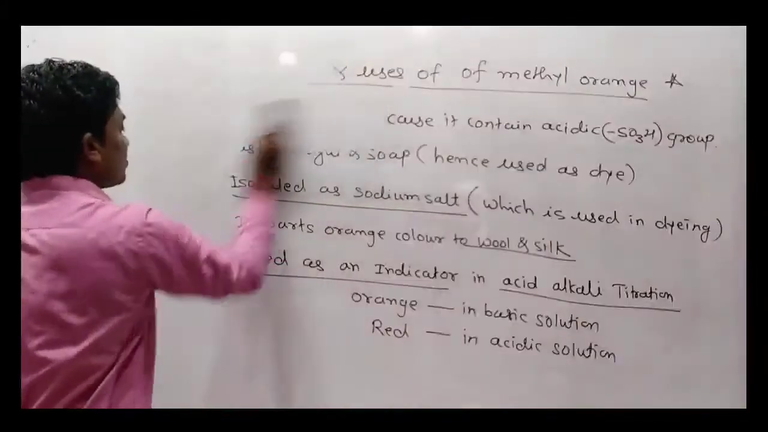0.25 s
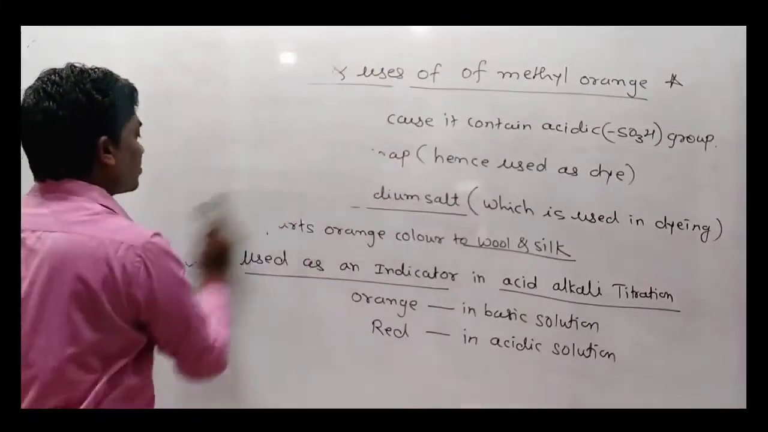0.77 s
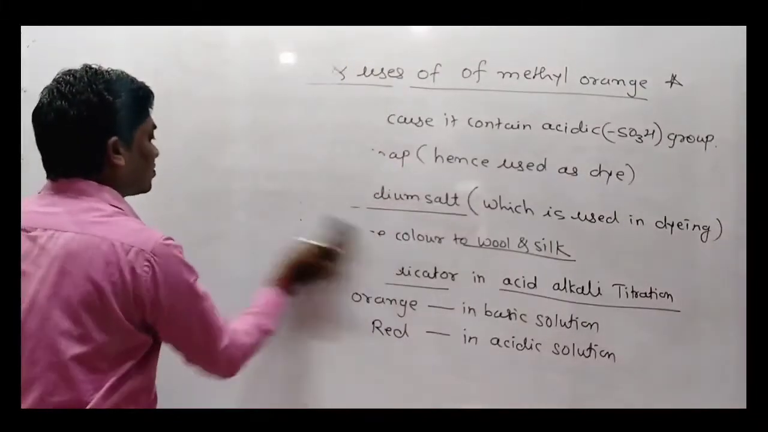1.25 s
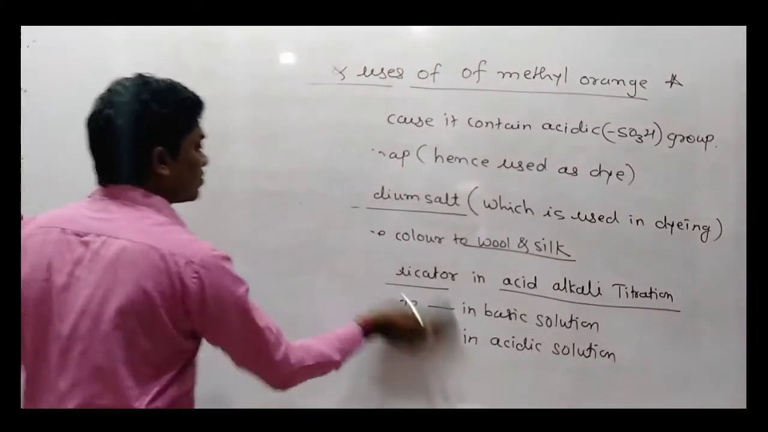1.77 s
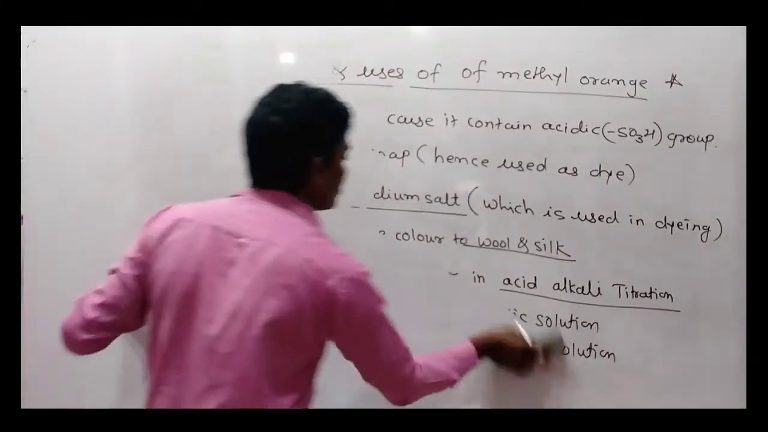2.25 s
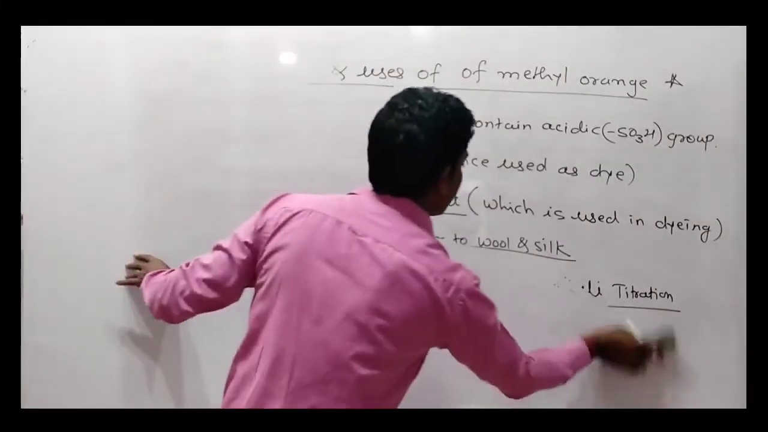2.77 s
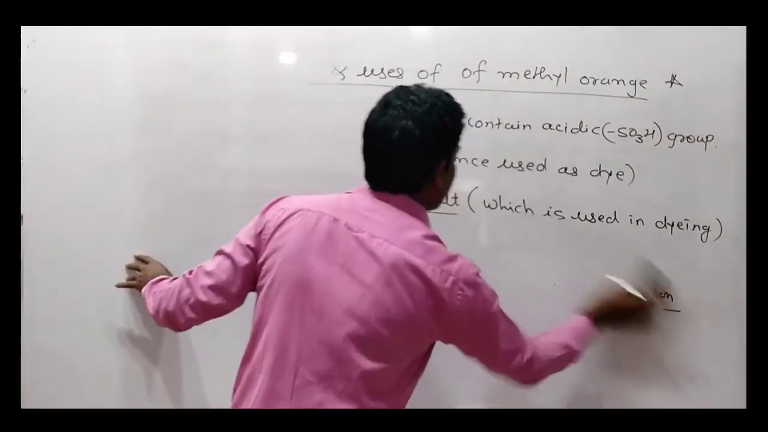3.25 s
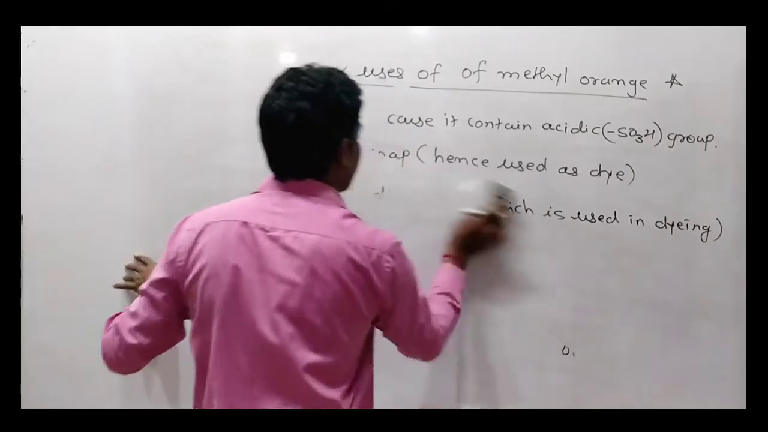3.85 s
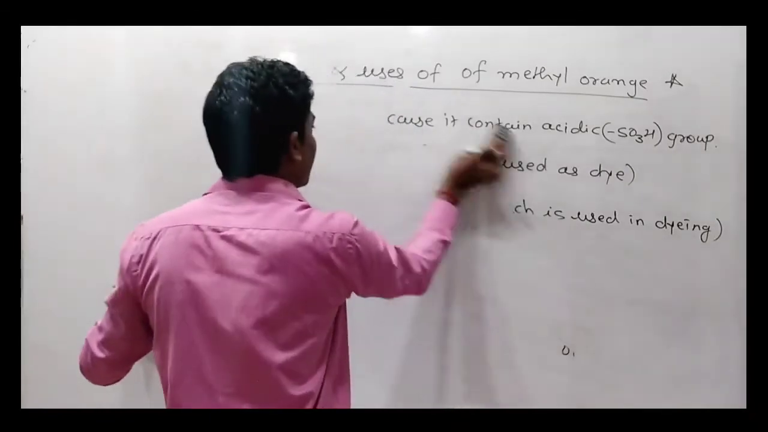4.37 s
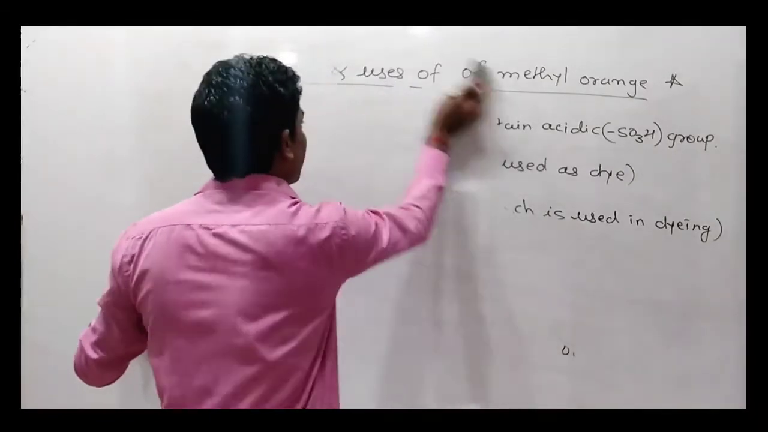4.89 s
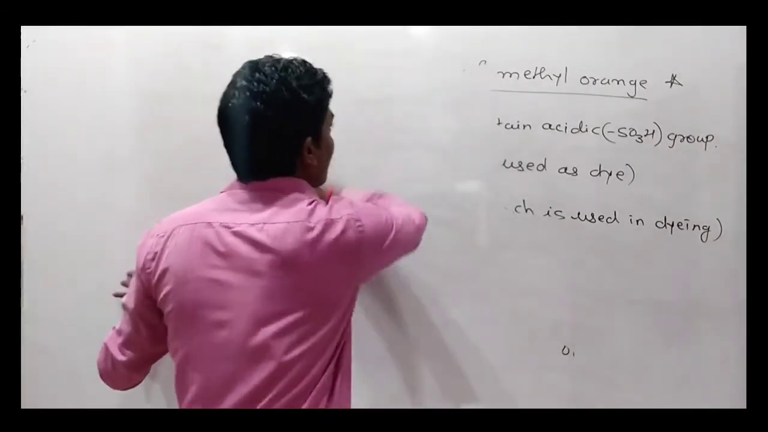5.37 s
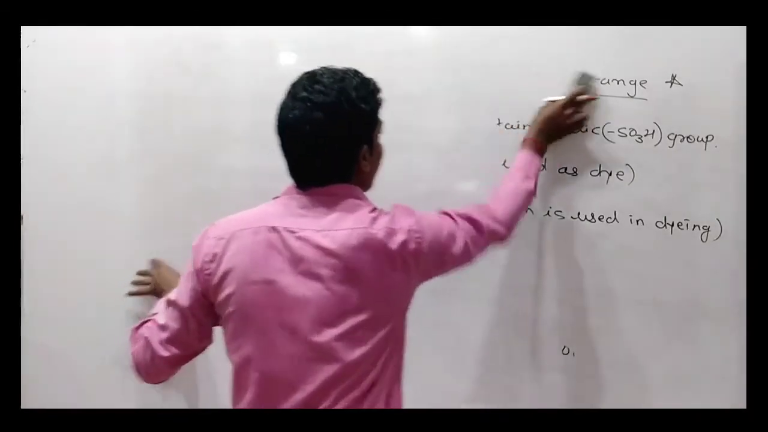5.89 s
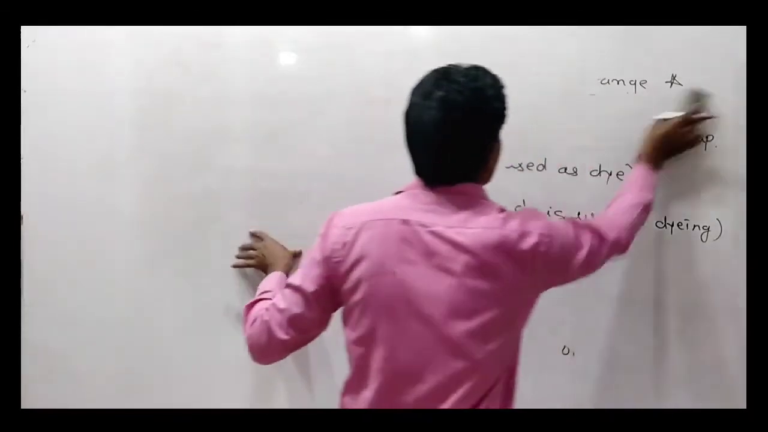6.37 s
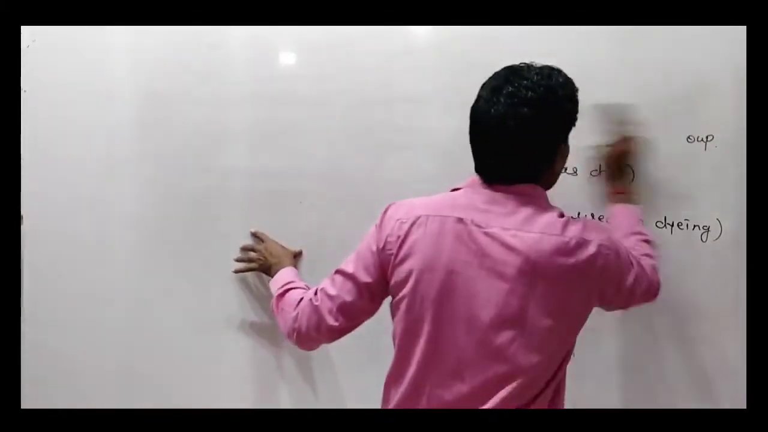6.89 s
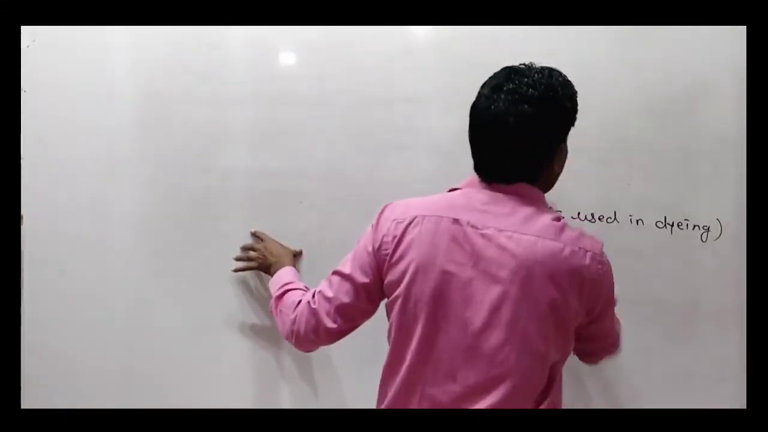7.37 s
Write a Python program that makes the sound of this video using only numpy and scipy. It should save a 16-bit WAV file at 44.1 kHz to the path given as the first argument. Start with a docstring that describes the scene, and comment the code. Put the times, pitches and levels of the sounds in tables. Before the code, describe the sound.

A felt duster wipes a loose whiteboard in quick hissing strokes, with scattered knocks, deep board wobble, brief rough squeals and low room rumble.

```python
"""From the outset a felt duster wipes a whiteboard in quick strokes, three to four a second: fibres slip
and hiss, fuller in places, while the loose board sways, drums and knocks over a low hum and room rumble.
Dull noise tails die away, mostly following knocks; three low thumps sound. Near 2.7 s and 7.1 s come
rasps, a rough rising squeal in scraping noise. A dull swell rises at 4.7 s, and near 5.4 s and 6.9 s thin
pairs of partials squeak and fall; rasps and squeaks ring on in a classroom of decaying noise."""
import sys
import numpy as np
from scipy import signal
from scipy.fft import rfft, irfft
from scipy.io import wavfile
from scipy.ndimage import uniform_filter1d

SR = 44100
rng = np.random.default_rng(int(sys.argv[2]) if len(sys.argv) > 2 else 0)


def digitize_waveform(pressure):
    """Quantize a signal to 16-bit integers and store it at the path in sys.argv[1].

    Rows of a 2-D input are taken as channels; values are limited to [-1, 1].
    """
    field = np.atleast_2d(pressure).T
    bounded = np.clip(field, -1, 1)
    quanta = np.round(bounded * 32767).astype(np.int16)
    wavfile.write(sys.argv[1], SR, quanta)


N = 336483
TIME = np.arange(N) / SR
TOP_HZ = 15600

# Wiping strokes: (start [s], length [s], hiss at full speed before the wiping trim [dB],
# share of the stroke spent speeding up, rubbing pressure at full speed before the trim [dB])
STROKES = [(-.12, 0.32, -64.5, 0.24, -56.5), (0.17, 0.23, -64, 0.62, -57.5),
           (0.378, 0.23, -62.5, 0.54, -57), (0.65, 0.25, -63.5, 0.64, -58), (0.901, 0.23, -61.5, 0.52, -60),
           (1.198, 0.26, -65.5, 0.55, -58), (1.434, 0.26, -63.5, 0.51, -60),
           (1.766, 0.18, -66, 0.79, -58.5), (1.956, 0.28, -63, 0.38, -59), (2.259, 0.2, -64, 0.77, -58),
           (2.46, 0.28, -61.5, 0.43, -60.5), (2.794, 0.3, -62.5, 0.46, -56),
           (3.078, 0.28, -61.5, 0.12, -57.5), (3.386, 0.3, -64, 0.6, -55.5),
           (3.648, 0.24, -62.5, 0.58, -56.5), (3.904, 0.19, -65, 0.66, -59.5),
           (4.104, 0.26, -64, 0.42, -60), (4.388, 0.21, -65.5, 0.77, -57.5), (4.61, 0.27, -65, 0.4, -62.5),
           (4.896, 0.43, -64, 0.37, -59), (5.293, 0.64, -63.5, 0.23, -60),
           (5.888, 0.23, -65.5, 0.61, -59.5), (6.113, 0.36, -63.5, 0.35, -57.5),
           (6.465, 0.27, -63.5, 0.72, -57), (6.737, 0.32, -63, 0.35, -58.5), (7.045, 0.34, -63, 0.58, -59),
           (7.33, 0.35, -62, 0.41, -58)]
# Spectrum of the slipping felt: (frequency [Hz], relative density [dB])
FELT_SPECTRUM = [(1200, -20), (2800, 0), (4500, 2.5), (7000, 1.5), (10000, -0.5), (13000, -0.5),
                 (16000, -4)]
# Spectrum of the rubbing passed into the board: (frequency [Hz], relative density [dB])
RUB_SPECTRUM = [(150, 1), (300, 4.5), (480, -2.5), (700, 0.5), (1000, -4.5), (1500, -3), (2000, -5),
                (2800, -5.5), (4000, -12.5), (7000, -20.5), (12000, -34)]
# Shoves that set the loose board moving: (time [s], sway level [dB], drumming level [dB])
PUSHES = [(0.0, -49, -41), (.13, -33.5, -37), (.40, -32, -46), (.69, -31, -55), (.88, -40.5, -56),
          (1.15, -34.5, -40), (1.44, -30.5, -43.5), (1.70, -37.5, -46.5), (2.08, -23.5, -46),
          (2.28, -28.5, -51), (2.451, -27, -47), (2.64, -35, -67), (3.028, -25.5, -41), (3.24, -33, -45.5),
          (3.669, -31, -51), (3.89, -32, -46), (4.35, -29, -52), (4.6, -30, -60), (4.80, -39, -44),
          (5.25, -30, -68), (6.249, -33.5, -47), (7.30, -32.5, -49)]
# Spectrum of the slow sway of the panel: (frequency [Hz], relative density [dB])
SWAY_SPECTRUM = [(8, -11.5), (16, 6), (23, 5.5), (32, -21), (43, -10), (55, -28), (70, -47), (120, -53)]
# Spectrum of the drumming of the panel: (frequency [Hz], relative density [dB])
DRUM_SPECTRUM = [(32, -10), (43, 9.5), (55, -6), (68, -11), (80, -6.5), (105, -14), (150, -19), (200, -24),
                 (270, -31.5), (400, -33), (800, -72)]
# Wavering of the low hum: (time [s], level before the hum trim [dB])
HUM_LEVEL = [(0.0, -68), (.2, -64), (.62, -51), (1.15, -56), (1.85, -52.5), (2.3, -56.5), (2.68, -60.5),
             (3.5, -55.5), (4.0, -54.5), (4.44, -65.5), (4.9, -52), (5.4, -62), (6.2, -69), (6.55, -57),
             (7.0, -53), (7.2, -59.5), (7.63, -58.5)]
# Spectrum of the steady room rumble: (frequency [Hz], relative density [dB])
ROOM_RUMBLE_SPECTRUM = [(60, -4), (130, -0.5), (190, 1.5), (260, -8), (340, -18.5), (600, -23.5)]
# Knocks of duster and board: (time [s], peak of the ring [dB], centre of the sound [Hz],
# tick re the ring's peak [dB], ring of the struck spot [Hz], snap re the ring's peak [dB])
TAPS = [(0.0754, -48, 1930, -22, 2400, -10), (0.1345, -31.5, 1070, -13.5, 1690, -4),
        (0.1479, -39, 1150, -23, 1410, -8), (0.22, -42, 1020, -19, 1600, -10),
        (0.626, -54, 1300, -20, 1250, -12), (0.824, -28.5, 1210, -10, 2500, -10),
        (1.044, -44.5, 2300, 0.5, 3240, -20), (1.0662, -42.5, 1600, -18, 1400, -12),
        (1.12, -47.5, 1670, -2, 1710, -10), (1.153, -43, 1100, -20, 1080, -10),
        (1.1605, -34, 1330, -7, 1285, -2), (1.198, -38.5, 1390, -19, 1790, -7),
        (1.4203, -28, 890, -17.5, 1320, -8), (1.58, -35.5, 1770, -23, 1800, -3),
        (1.659, -44, 1490, -20, 1490, -1), (2.2534, -45.5, 1690, -12, 1750, -3),
        (2.3244, -41.5, 1550, -26, 1450, -10), (2.4537, -40.5, 770, -24, 695, -10),
        (2.7582, -42.5, 1550, -19, 1510, -14), (2.867, -36, 1270, -22, 1080, -5),
        (3.0539, -26, 800, -22, 580, -4.5), (3.134, -43, 1100, -20, 1400, -10),
        (3.3457, -46, 1500, -19, 1500, -12), (3.523, -39.5, 1730, -26, 1550, -4),
        (3.6138, -44, 1290, -11, 1220, -10), (3.6841, -26, 734, -23, 1064, -6.5),
        (3.9508, -41.5, 1480, -26, 1530, -19), (4.014, -45, 1404, -16, 1380, -8),
        (4.1938, -44, 810, -17, 845, -9), (4.346, -44, 1700, -18, 1810, -8),
        (4.6175, -33, 850, -17, 1250, -8), (4.995, -47, 1430, -11, 1800, -8),
        (5.258, -31.5, 850, -15, 1590, -5.5), (5.6891, -37.5, 1750, -22, 1960, -18),
        (5.8382, -37.5, 1310, -27, 1480, -4), (5.8496, -41, 1400, -24, 1500, -14),
        (5.879, -47, 850, -24, 810, -12), (5.976, -48, 990, -24, 1090, -12),
        (6.1982, -37, 1200, -26, 1470, -21), (6.5425, -47, 1600, -18, 1500, -10),
        (6.592, -44.5, 2190, -16, 2320, -10), (6.6473, -35.5, 1270, -3.5, 2080, -5),
        (7.2422, -33.5, 1080, -10, 1630, -9), (7.319, -32, 800, -11, 1520, 2),
        (7.615, -44, 2430, -6, 2330, -8)]
# Modes that every knock excites, before their random scatter:
# (frequency [Hz], level [dB], decay by 60 dB [s])
BOARD_MODES = [(310, 10, 0.01), (570, -1, 0.013), (670, 23, 0.0089), (1135, 11, 0.011), (1552, 7, 0.019),
               (2298, 10, 0.01), (2480, 6.5, 0.0077), (3200, 11, 0.0056)]
# Spectrum of the sharp tick of a knock: (frequency [Hz], relative density [dB])
TICK_SPECTRUM = [(500, -9), (3000, 4), (8000, 6), (12000, -1.5), (16000, -3)]
# Spectrum of the dry snap at the start of a knock: (frequency [Hz], relative level [dB])
SNAP_SPECTRUM = [(450, -7), (800, -1.5), (1400, -4), (2300, 2), (3000, 2.5), (3800, -11), (9000, -26)]
# Reverberation of the classroom: (frequency [Hz], decay by 60 dB [s])
ROOM_T60 = [(200, 1.1), (1000, 1.28), (3000, 1.68), (4600, 1.63), (6000, 1.29), (9000, 0.54), (15000, 0.27)]
# Dull noise tails, mostly following knocks: (start [s], level [dB], decay by 60 dB [s])
DULL_TAILS = [(0.143, -54.5, 1), (2.87, -51.5, 0.24), (3.056, -72, 0.98), (3.689, -54, 0.52),
              (6.648, -63, 0.49)]
# Spectrum of a dull tail: (frequency [Hz], relative density [dB])
DULL_TAIL_SPECTRUM = [(330, -5), (480, 1.5), (680, -3), (1100, -10), (2000, -22), (4000, -23)]
# Stretches where the wiping sounds fuller:
# (middle [s], length [s], level before the fade [dB], resonance at 0.8 of full speed [Hz])
FULLER_STRETCHES = [(0.31, 0.17, -70, 3000), (0.27, 0.22, -66, 1200), (0.849, 0.41, -65, 2500),
                    (1.048, 0.21, -63, 3080), (1.19, 0.16, -68, 2500), (1.613, 0.16, -62.5, 2860),
                    (2.093, 0.26, -62.5, 2550), (2.376, 0.16, -63.5, 2120), (2.594, 0.19, -61, 2680),
                    (5.063, 0.25, -74, 2600), (5.721, 0.47, -66.5, 4400), (6.25, 0.33, -71, 4600),
                    (6.328, 0.46, -64, 1400), (6.555, 0.17, -61.5, 1660)]
# Landings of the duster's heel: (time [s], level [dB], panel mode [Hz], decay by 60 dB [s])
THUMPS = [(1.149, -45, 91.5, .3), (2.082, -32, 76.5, .22), (3.049, -34, 59.4, 0.56)]
# Bursts of the rasps: (start [s], length [s], level before the fade and room mix [dB], start pitch [Hz],
# end pitch [Hz], squeal re the level [dB], upper edge of the scrape [Hz], its lifted band [Hz])
RASPS = [(2.707, 0.044, -57, 2046, 2194, -2, 4800, 4270), (2.761, 0.057, -46, 2750, 3410, -7, 7000, 5640),
         (2.802, 0.063, -44, 2550, 2930, -8, 6600, 6400),
         (2.862, 0.0426, -44.5, 2740, 3110, -4.5, 6360, 4600),
         (2.907, 0.042, -43, 2856, 3480, -5.5, 6150, 3650),
         (2.966, 0.063, -43.5, 3106, 3390, -7, 6140, 6050), (7.083, 0.03, -54, 1870, 2480, -4, 8100, 7400),
         (7.153, 0.036, -46.5, 2536, 2897, -8, 6400, 5500),
         (7.19, 0.041, -44.5, 2002, 2610, -3.5, 5350, 4200), (7.23, 0.026, -58, 2600, 2800, -5, 6300, 4300),
         (7.267, 0.043, -40.5, 3210, 3520, -11, 6900, 6270)]
# Spectrum of the scrape in a rasp: (frequency [Hz], relative density [dB])
RASP_SPECTRUM = [(1000, -23), (1900, -12), (2500, 3.5), (3100, -4), (3800, 0.5), (4700, 0.5), (5500, 1.5),
                 (6400, -4.5), (7200, -4), (10000, 0.5), (15000, -15)]
# Narrow bands lifted or cut in every rasp: (frequency [Hz], width [Hz], lift [dB])
RASP_RINGS = [(2870, 120, 5.5), (3175, 110, 5), (3450, 81, 6), (4130, 60, -3), (4760, 25, 6), (5100, 40, 3),
              (6260, 60, 0)]
# Spectrum of the dull swell: (frequency [Hz], relative density [dB])
SWELL_SPECTRUM = [(50, -13), (90, 8), (140, -2), (210, -0.5), (300, -5), (420, -16), (700, -14),
                  (1500, -63)]
# Falling squeaks: (start [s], length [s], start pitch [Hz], end pitch [Hz],
# direct level [dB], upper partial re the lower one [dB])
SQUEAKS = [(5.35, 0.12, 3105, 2646, -58.5, -10), (6.848, 0.074, 3170, 2970, -59, -8),
           (6.906, 0.063, 2774, 2506, -59, -19)]


def undb(db):
    """Decibel law: level to amplitude ratio."""
    return 10 ** (np.asarray(db) / 20)


def unit(x):
    """Normalisation to an rms of 1."""
    return x / np.sqrt(np.mean(x ** 2))


def decay(age, t60):
    """Exponential damping: a fall of 60 dB in t60 seconds."""
    return np.exp(-np.log(1000) * age / t60)


def lookup(hz, points):
    """Interpolation of (frequency, value) points on a logarithmic frequency axis."""
    f, value = np.transpose(points)
    return np.interp(np.log(hz + 1), np.log(f), value)


def bins(n):
    """Frequencies of the Fourier components of n samples."""
    return np.arange(n // 2 + 1) * SR / n


def colour(x, points):
    """Spectral shaping: the given curve, rolled off steeply beyond its end points, at rms 1."""
    hz = bins(len(x))
    ends = np.minimum(hz / points[0][0], 1) ** 2 / np.maximum(hz / points[-1][0], 1) ** 2
    return unit(irfft(rfft(x) * undb(lookup(hz, points)) * ends, len(x)))


def resonate(x, rings):
    """Resonance in parallel: narrow bands are lifted or cut beside the direct sound."""
    hz = bins(len(x))
    gain = 1 + sum((undb(db) - 1) / (1 + 2j * (hz - f) / width) for f, width, db in rings)
    return irfft(rfft(x) * gain, len(x))


def sweep(x, hz, width_hz):
    """Heterodyne resonance: shift the moving centre to zero, low-pass, and shift back; rms 1."""
    turn = np.exp(2j * np.pi * np.cumsum(hz) / SR)
    pole = np.exp(-np.pi * width_hz / SR)
    lowpassed = signal.lfilter([1], np.poly([pole, pole]), x / turn)
    return unit(np.real(turn * lowpassed))


def walk(rate):
    """Smoothed random steps: a wander of rms 1, with `rate` steps a second."""
    k = int(SR / rate)
    steps = np.repeat(rng.standard_normal(N // k + 1), k)
    return unit(uniform_filter1d(steps, k))[:N]


def add(out, start, sound):
    """Superposition: mix a sound in at a time in seconds."""
    i = max(int(start * SR), 0)
    out[i:i + len(sound)] += sound[:N - i]


def catches(per_s, spread_db):
    """Impulsive noise, as from slipping fibres: random clicks of unequal size; rms 1."""
    size = undb(spread_db * np.minimum(rng.exponential(size=N), 5))
    return unit((rng.random(N) < per_s / SR) * size * rng.standard_normal(N))


def stroke_speed(start, length, rise):
    """Reciprocating motion: speed climbs from one turn to 1 and falls to 0 at the next."""
    peak = start + length * np.clip(rise, .1, .9)
    turn = np.interp(TIME, [start, peak, start + length], [0, 1, 0])
    return np.sin(np.pi / 2 * turn)


def wiping(hiss_db=2, rub_db=-0.5, grain_db=-1.0, scratch_db=-12.0, flutter_db=1.69,
           shell_db=-9, shell_hz=1350, shell_width_hz=550,
           shell_rise_octaves=0.32, shell_drift_octaves=0.23):
    """Sliding friction: slips crowd with speed, pressure drives the board, the shell's resonance climbs."""
    turn_hiss, turn_force = undb(-71.5), undb(-59.5)  # left while the hand turns
    pace, hiss_gain, force = 0, turn_hiss, turn_force
    for start, length, db, rise, pressure_db in STROKES:
        arc = stroke_speed(start, length, rise)
        pace = pace + arc
        hiss_gain = hiss_gain + arc * (undb(db) - turn_hiss)
        force = force + arc * (undb(pressure_db) - turn_force)
    slips_per_s = 9000 + 14000 * unit(hiss_gain)
    hiss = colour(catches(slips_per_s, spread_db=-0.5), FELT_SPECTRUM) * hiss_gain
    scratches = undb(scratch_db) * catches(90, spread_db=0.5)
    rub = colour(catches(6000, spread_db=grain_db) + scratches, RUB_SPECTRUM)
    octaves = shell_rise_octaves * (pace - .5) + shell_drift_octaves * walk(5)
    shell = sweep(catches(900, spread_db=0), shell_hz * 2 ** octaves, shell_width_hz)
    shell = undb(shell_db) * pace * shell
    rub_gain = undb(rub_db + flutter_db * walk(25))
    return undb(hiss_db) * hiss + rub_gain * (rub + shell) * force


def push_envelope(start, attack_s=0.0184, hold_s=0.047, t60_s=1):
    """Transient forcing: a shove builds up, holds briefly and dies away."""
    age = TIME - start
    build = np.clip(age / attack_s, 0, 1)
    return build * decay(np.maximum(age - attack_s - hold_s, 0), t60_s)


def rumble(sway_db=-42, drum_db=-49, drum_fall_db_per_s=.5):
    """Forced plate motion: sway and drumming powers add to their floors at every shove."""
    sway = undb(sway_db) ** 2
    drum = undb(drum_db - drum_fall_db_per_s * TIME) ** 2
    for start, push_sway_db, push_drum_db in PUSHES:
        surge = push_envelope(start)
        sway = sway + (undb(push_sway_db) * surge) ** 2
        drum = drum + (undb(push_drum_db) * surge) ** 2
    out = 0
    for spectrum, power in (SWAY_SPECTRUM, sway), (DRUM_SPECTRUM, drum):
        motion = colour(rng.standard_normal(N), spectrum)
        # Even out the noise over 1/8 s, so that the power curve sets the level
        steady = unit(motion / np.sqrt(uniform_filter1d(motion ** 2, SR // 8)))
        out = out + np.sqrt(power) * steady
    return out


def hum(centre_hz=137, trim_db=-4):
    """Frequency and amplitude modulation: a sine wanders in pitch and level."""
    phase = 2 * np.pi * np.cumsum(centre_hz + 6 * walk(18)) / SR
    tone = unit(np.sin(phase) * undb(1.34 * walk(5.6)))
    return undb(trim_db + np.interp(TIME, *np.transpose(HUM_LEVEL))) * tone


def room_rumble(level_db=-64):
    """Stationary noise: a steady low rumble with a fixed spectrum."""
    return undb(level_db) * colour(rng.standard_normal(N), ROOM_RUMBLE_SPECTRUM)


def bending_pulse(n, travel_s=0.00074, echo_s=0.0052, echo_db=-11):
    """Dispersion of bending waves: a push arrives highs first, with faint frame echoes; peak 1."""
    hz = np.arange(1, n // 2 + 2) * SR / n
    paths = np.append(travel_s, travel_s + echo_s * rng.random(3))[:, None]  # delay at 1 kHz
    sizes = np.append(1, undb(echo_db) * rng.standard_normal(3))[:, None]
    # Phase grows as the root of frequency, so delay shrinks with it
    waves = np.sum(sizes * np.exp(-4j * np.pi * paths * np.sqrt(1000 * hz)), axis=0)
    low_cut = np.minimum(hz / SNAP_SPECTRUM[0][0], 1) ** 2
    pulse = irfft(waves * undb(lookup(hz, SNAP_SPECTRUM)) * low_cut, n)
    return pulse / np.abs(pulse).max()


def taps(octaves=0.76, lag_s=0.00071, tick_s=0.0013, spot_db=11, spot_t60_s=0.017):
    """Modal synthesis: damped modes of board and struck spot, the lows delayed by dispersion."""
    out, t = np.zeros(N), TIME[:SR // 25]
    for start, db, centre_hz, tick_db, spot_hz, snap_db in TAPS:
        modes = BOARD_MODES + [(spot_hz, spot_db, spot_t60_s)]
        hz, mode_db, t60 = np.transpose(modes)[:, :, None]
        f = hz * (1 + .03 * rng.standard_normal(hz.shape))
        mode_db = mode_db + 2.0 * rng.standard_normal(hz.shape)  # the place of the blow favours some modes
        travel = lag_s * np.sqrt(hz[1] / f)  # lag_s holds at the second mode
        age = np.maximum(t - travel + travel.min(), 0)
        weight = undb(mode_db) * np.exp(-.5 * (np.log2(f / centre_hz) / octaves) ** 2)
        swing = np.minimum(age * f, 1) * decay(age, t60)  # each mode builds up in one cycle
        ring = np.sum(weight * swing * np.sin(2 * np.pi * f * age), axis=0)
        ring = ring / np.abs(ring).max()
        tick = colour(rng.standard_normal(len(t)), TICK_SPECTRUM) * np.exp(-t / tick_s)
        snap = bending_pulse(len(t))
        add(out, start, undb(db) * (ring + undb(snap_db) * snap + undb(tick_db) * tick))
    return out


def room(x):
    """Diffuse reverberation: convolution with noise bands, of which the highest treble dies first."""
    t = TIME[:2 * SR]
    hz = np.arange(SR + 1) / 2
    noise, tail = rfft(rng.standard_normal(len(t))), 0
    edges = np.geomspace(60, 16000, 15)
    for lo, hi in zip(edges, edges[1:]):
        band = irfft(noise * ((hz >= lo) & (hz < hi)))
        tail = tail + band * decay(t, lookup(np.sqrt(lo * hi), ROOM_T60))
    tail = tail * np.clip((t - .004) / 0.00029, 0, 1)  # the echo sets in after 4 ms
    return signal.fftconvolve(x, tail / np.sqrt(np.sum(tail ** 2)))[:N]


def dull_tails():
    """Exponential decay of dense clicks: dull noise tails, mostly following knocks, die away."""
    fade = 0
    for start, db, t60 in DULL_TAILS:
        fade = fade + (TIME > start) * undb(db - 60 * np.abs(TIME - start) / t60)
    return fade * colour(catches(900, spread_db=1.0), DULL_TAIL_SPECTRUM)


def fuller_wiping(width_share=0.54, glide_octaves=0.16):
    """Friction noise through a resonance that follows the hand's speed."""
    out = np.zeros(N)
    for middle, length, db, hz in FULLER_STRETCHES:
        n = int(length * SR)
        speed = np.hanning(n)
        centre = hz * 2 ** (glide_octaves * (speed - .8))
        grains = sweep(catches(1500, spread_db=0.5)[:n], centre, width_share * hz)
        add(out, middle - length / 2, undb(db) * grains * speed)
    return out


def thumps():
    """Free vibration: the duster's heel lands and one low mode of the panel booms."""
    out, t = np.zeros(N), TIME[:SR]
    for start, db, hz, t60 in THUMPS:
        swing = np.minimum(t * hz, 1) * decay(t, t60)
        add(out, start, undb(db) * swing * np.sin(2 * np.pi * hz * t))
    return out


def rasps(octave_db=-3, scrape_db=-3.0, echo_db=-3, above_edge_db=-13, bright_db=6, bright_width_hz=800):
    """Rough friction: a jittered, rising squeal and its octave within dense scraping noise."""
    out = np.zeros(N)
    for start, length, db, from_hz, to_hz, squeal_db, edge_hz, bright_hz in RASPS:
        n = int(length * SR)
        rough = 1 + .065 * walk(1500)[:n]
        phase = 2 * np.pi * np.cumsum(np.linspace(from_hz, to_hz, n) * rough) / SR
        squeal = unit(np.sin(phase) + undb(octave_db) * np.sin(2 * phase))
        uneven_noise = rng.standard_normal(SR // 4) * undb(4.6 * walk(173)[:SR // 4])
        scrape = colour(uneven_noise, RASP_SPECTRUM)
        shelf = [(100, 0), (edge_hz, 0), (1.08 * edge_hz, above_edge_db), (TOP_HZ, above_edge_db)]
        scrape = resonate(colour(scrape, shelf), [(bright_hz, bright_width_hz, bright_db)])
        scrape = unit(scrape[:n])
        burst = undb(squeal_db) * squeal + undb(scrape_db) * scrape
        add(out, start, undb(db) * burst * signal.windows.tukey(n, .45))
    out = resonate(out, RASP_RINGS)
    return out / np.sqrt(2) + undb(echo_db) * room(out)


def swell(level_db=-48, start_s=4.71, attack_s=0.14, t60_s=2.15,
          ring_hz=318, ring_db=-61, ring_start_s=4.88, ring_s=0.445):
    """Noise envelope: a dull swell rises and dies away, with a low wandering tone in its decay."""
    age = TIME - start_s
    envelope = np.clip(age / attack_s, 0, 1) * decay(np.maximum(age - attack_s, 0), t60_s)
    out = undb(level_db) * envelope * colour(rng.standard_normal(N), SWELL_SPECTRUM)
    n = int(ring_s * SR)
    ring = unit(np.sin(2 * np.pi * np.cumsum(ring_hz + 5 * walk(37)[:n]) / SR))
    add(out, ring_start_s, undb(ring_db) * ring * signal.windows.tukey(n, .5))
    return out


def squeaks(upper_ratio=1.235, echo_db=-1, air_db=-10, air_width_hz=700, waver_share=0.011):
    """Inharmonic partials: two thin tones slide down together, with air noise round the upper one."""
    out = np.zeros(N)
    for start, length, from_hz, to_hz, db, upper_db in SQUEAKS:
        n = int(length * SR)
        hz = np.linspace(from_hz, to_hz, n) * (1 + waver_share * walk(400)[:n])
        phase = 2 * np.pi * np.cumsum(hz) / SR
        tone = unit(np.sin(phase) + undb(upper_db) * np.sin(upper_ratio * phase))
        air = undb(air_db) * sweep(rng.standard_normal(n), upper_ratio * hz, air_width_hz)
        add(out, start, undb(db) * unit((tone + air) * signal.windows.tukey(n, .7)))
    return out + undb(echo_db) * room(out)


def scene(tap_room_db=-12):
    """Superposition at one microphone close to the board."""
    knocks = taps()
    board = wiping() + rumble() + knocks + undb(tap_room_db) * room(knocks)
    board = board + dull_tails() + fuller_wiping() + thumps()
    background = hum() + room_rumble() + swell()
    return (board + background + rasps() + squeaks())[None]


def record(dry):
    """Band limitation: the phone cuts the top with a steep low-pass."""
    return signal.sosfilt(signal.ellip(10, .2, 70, TOP_HZ, fs=SR, output="sos"), dry)


dry = scene()
out = record(dry)
digitize_waveform(out)
```